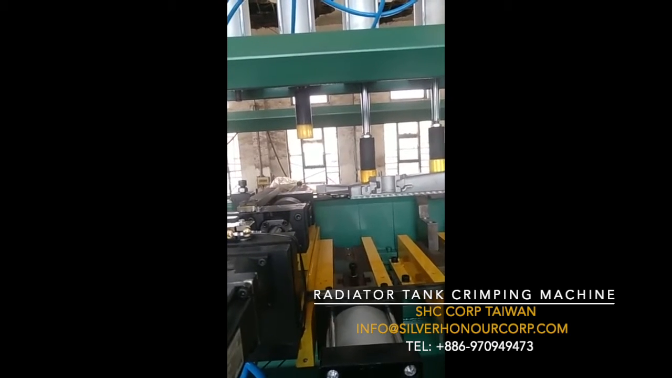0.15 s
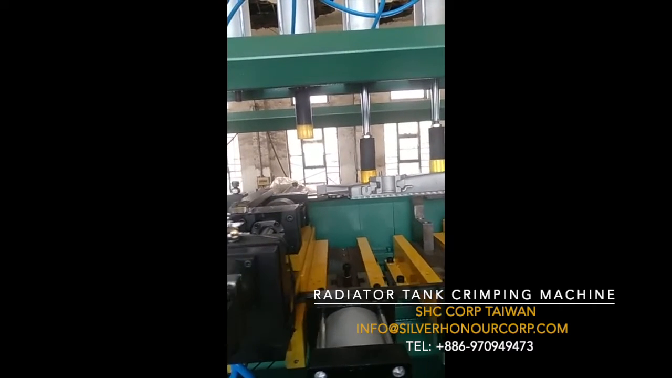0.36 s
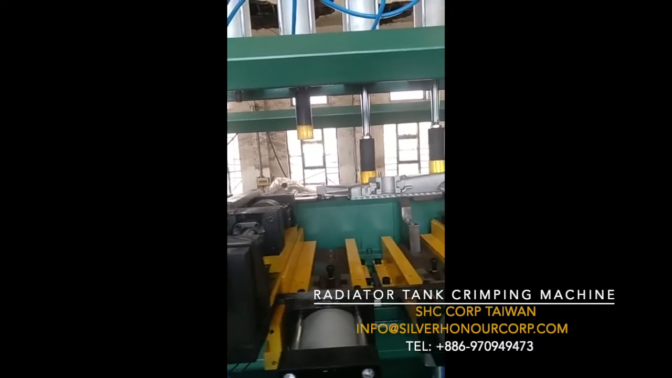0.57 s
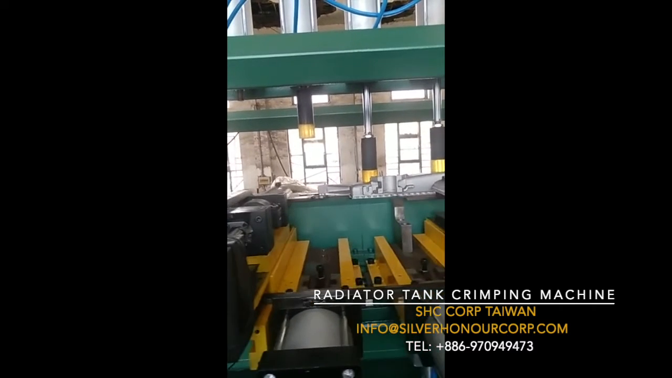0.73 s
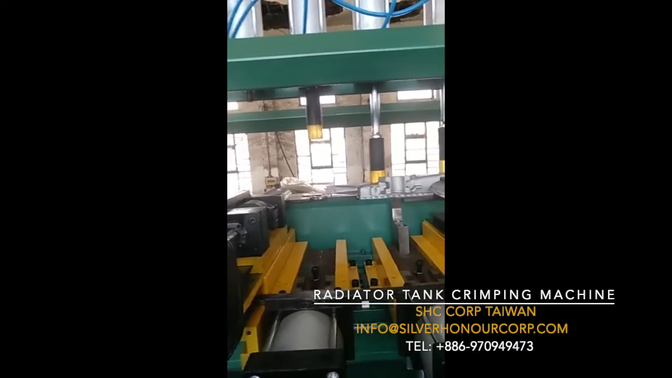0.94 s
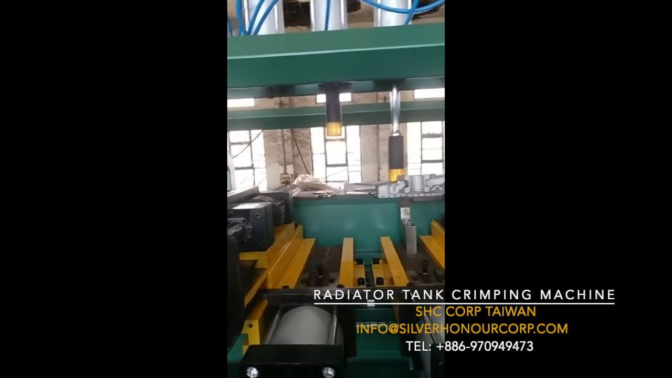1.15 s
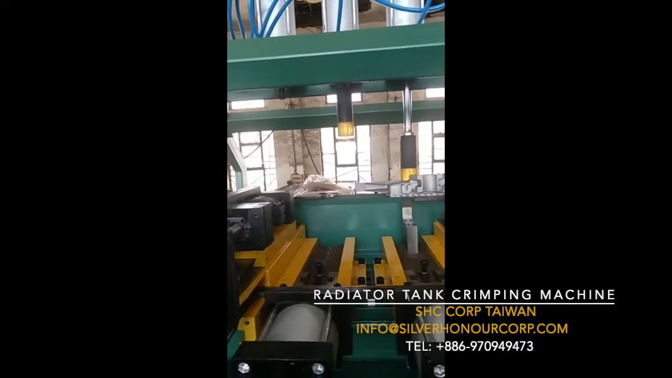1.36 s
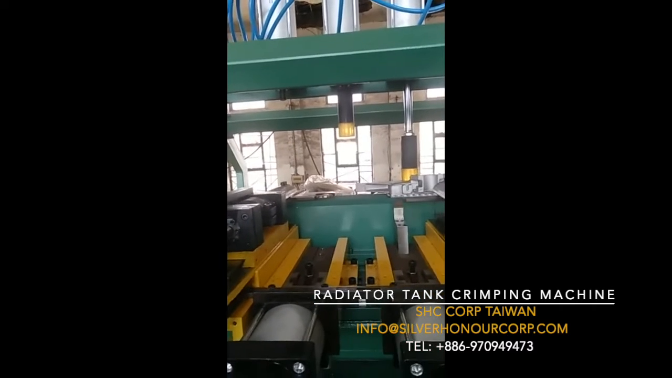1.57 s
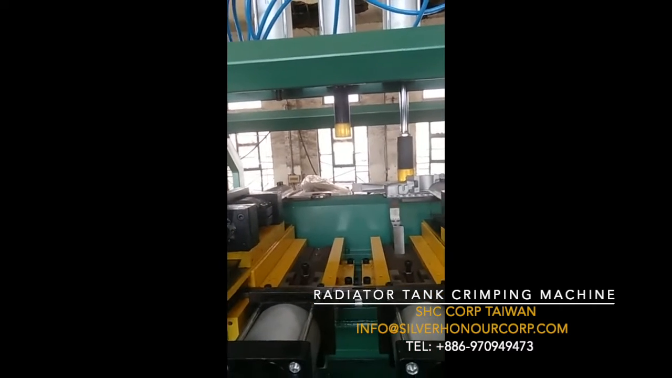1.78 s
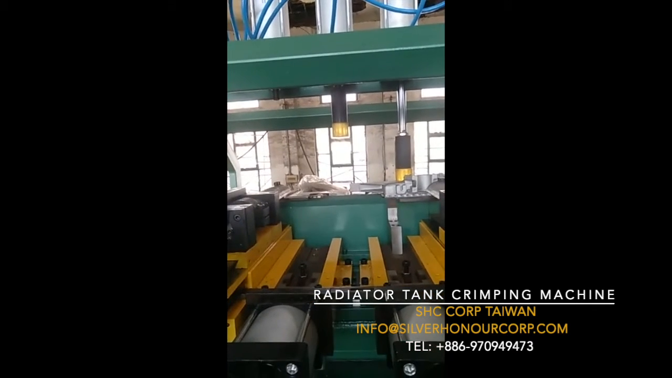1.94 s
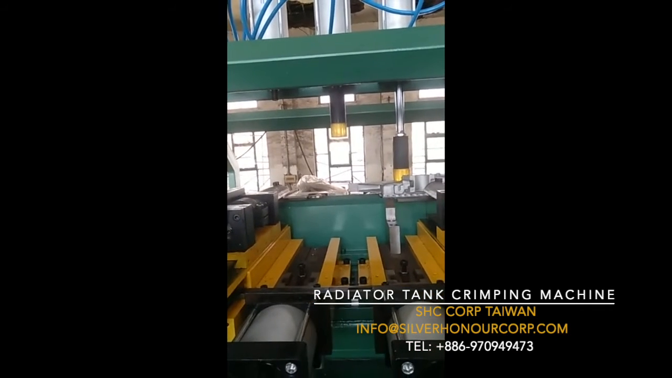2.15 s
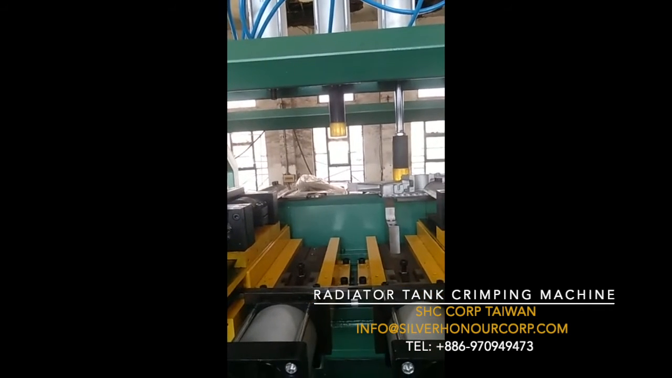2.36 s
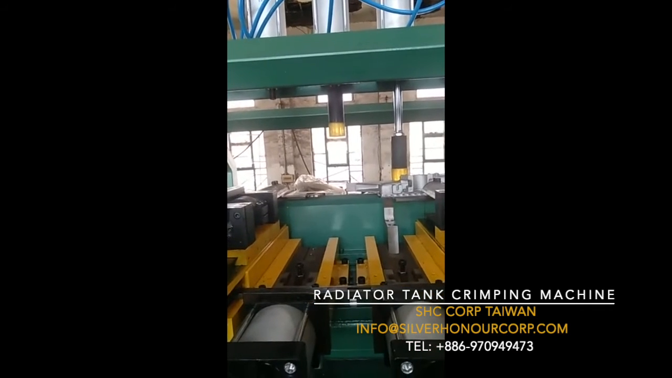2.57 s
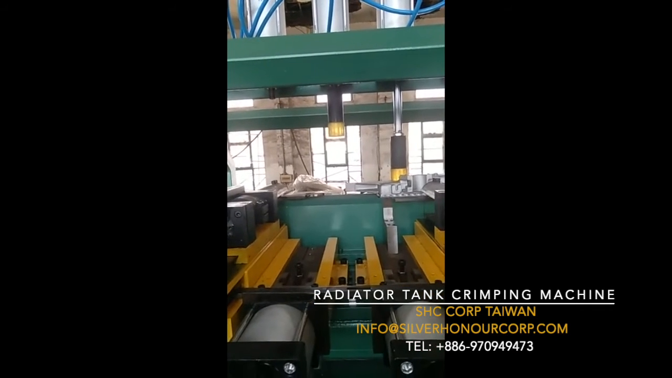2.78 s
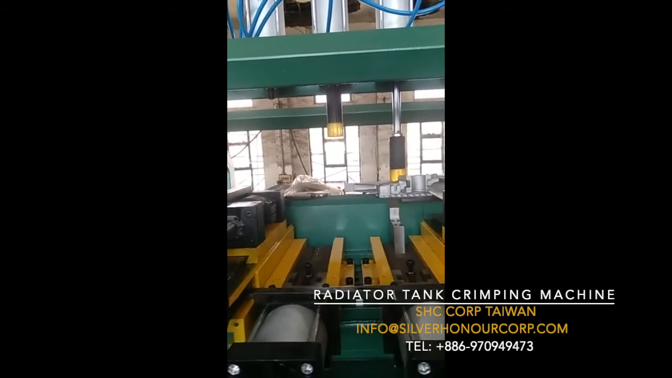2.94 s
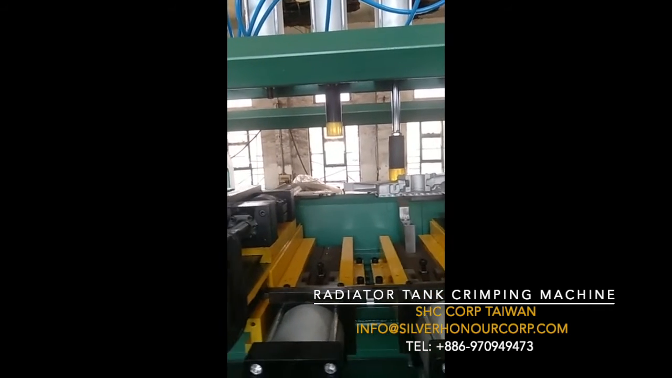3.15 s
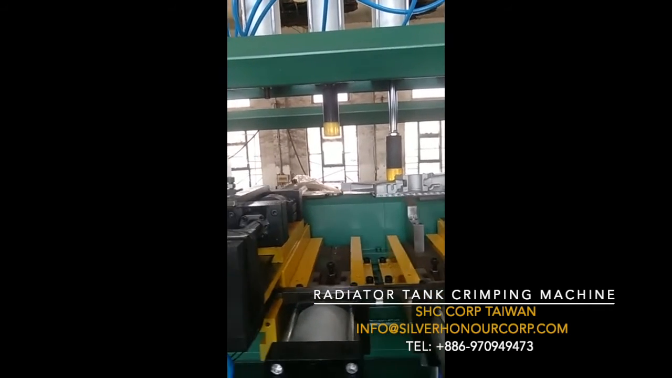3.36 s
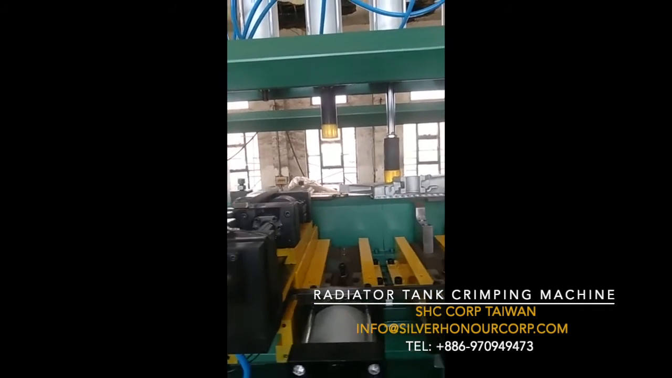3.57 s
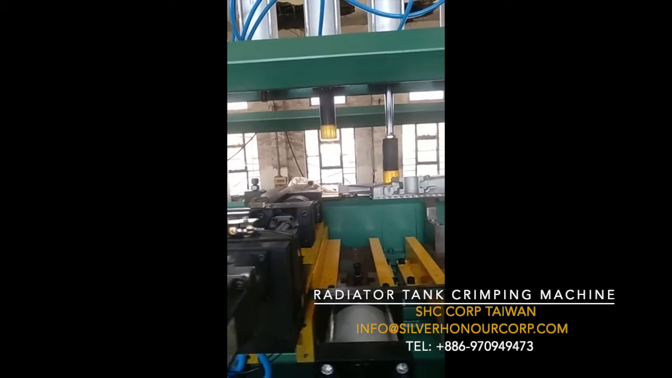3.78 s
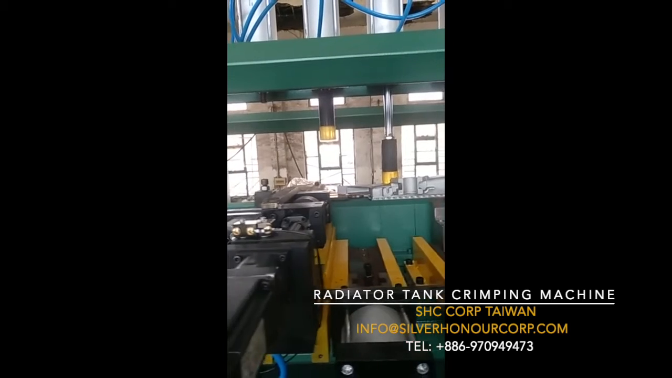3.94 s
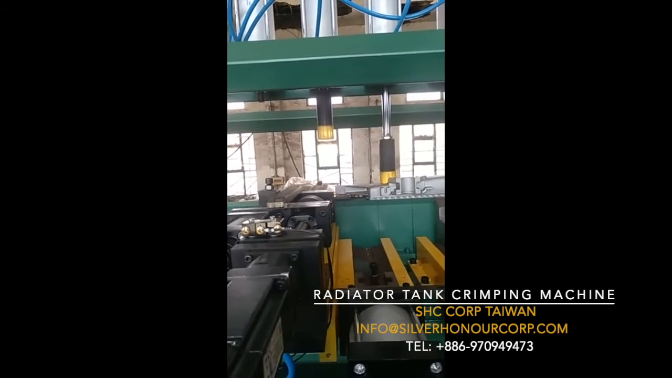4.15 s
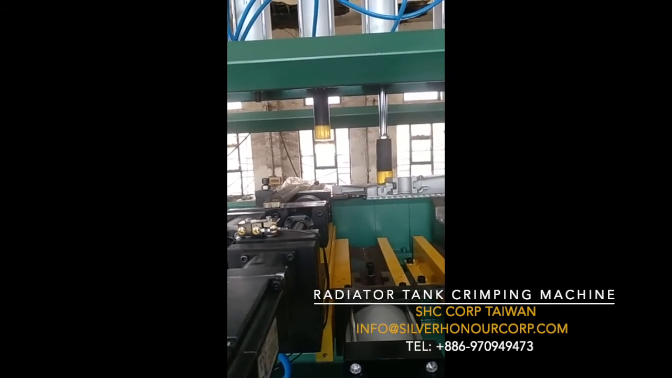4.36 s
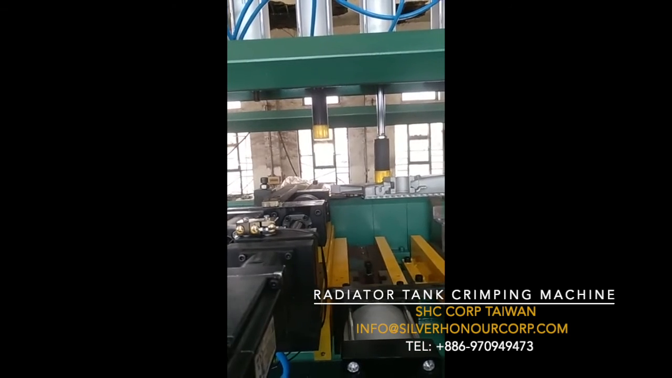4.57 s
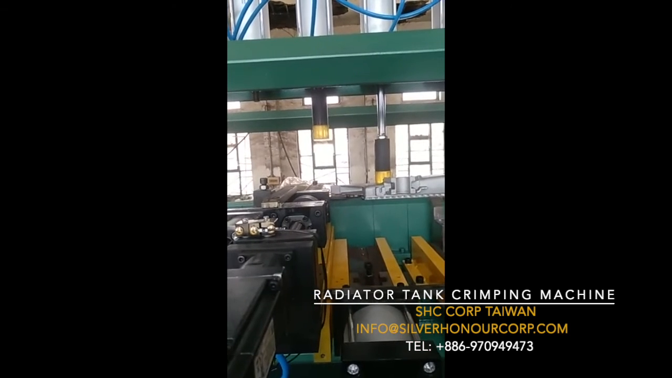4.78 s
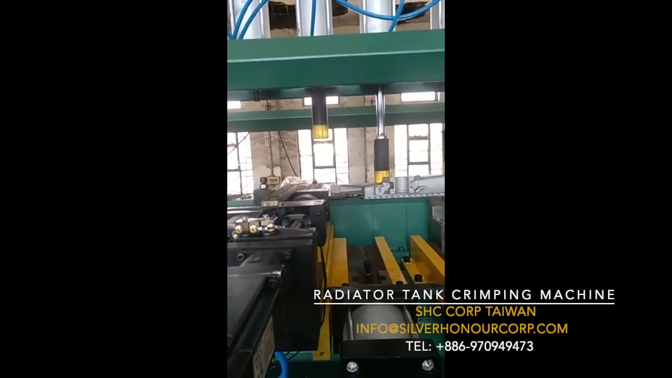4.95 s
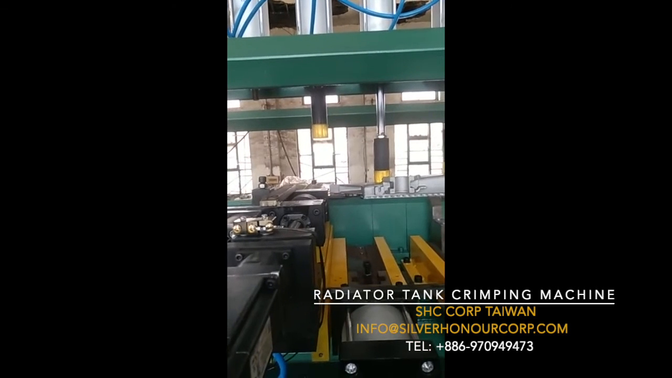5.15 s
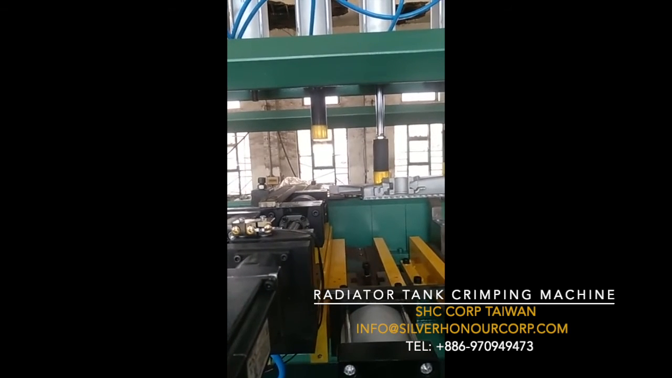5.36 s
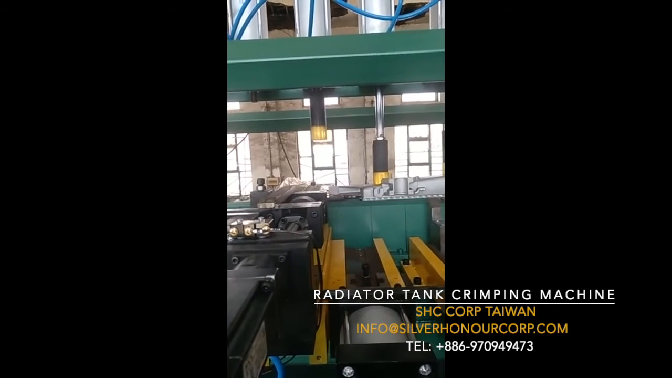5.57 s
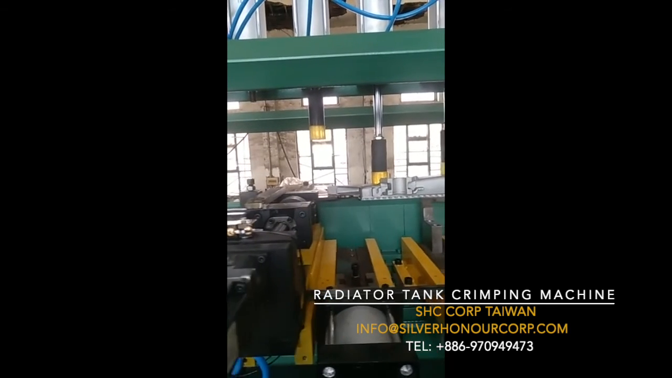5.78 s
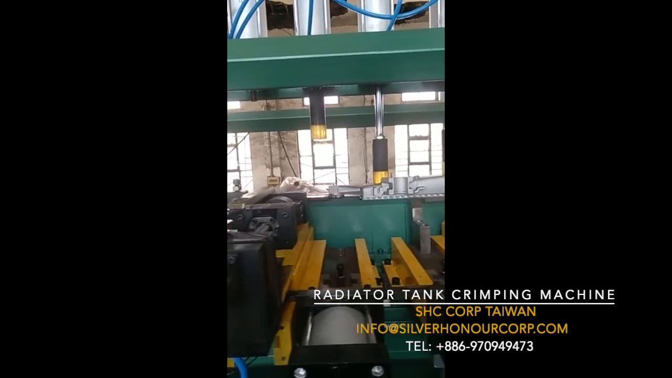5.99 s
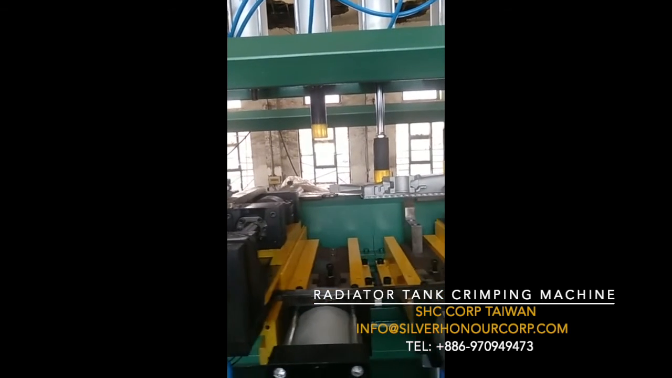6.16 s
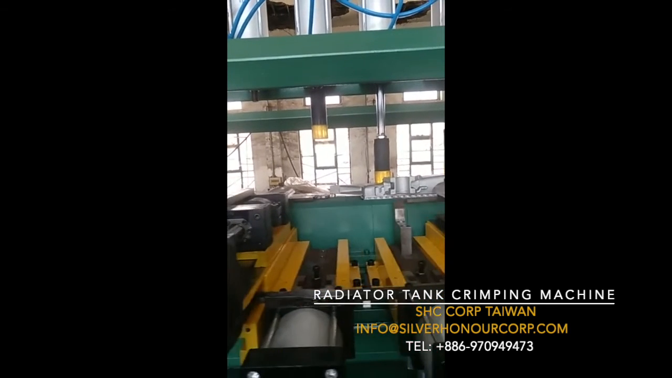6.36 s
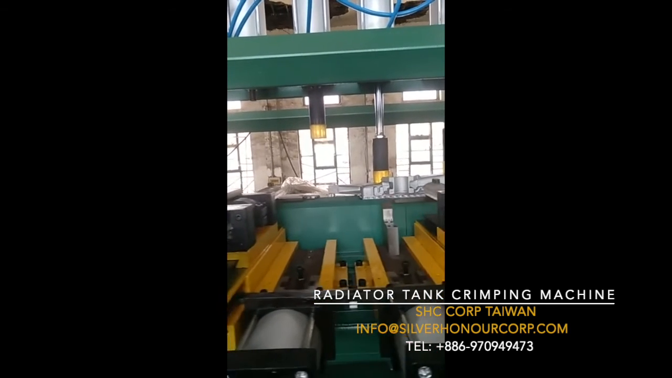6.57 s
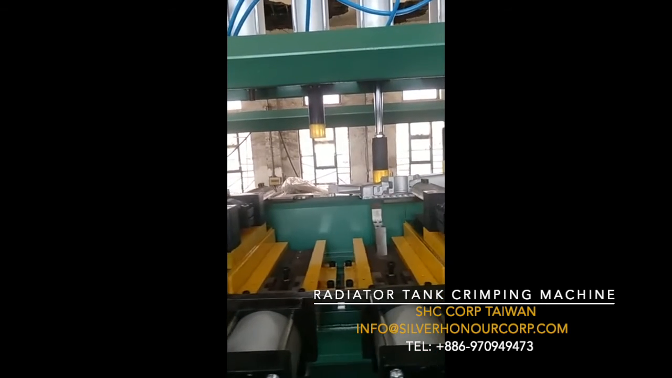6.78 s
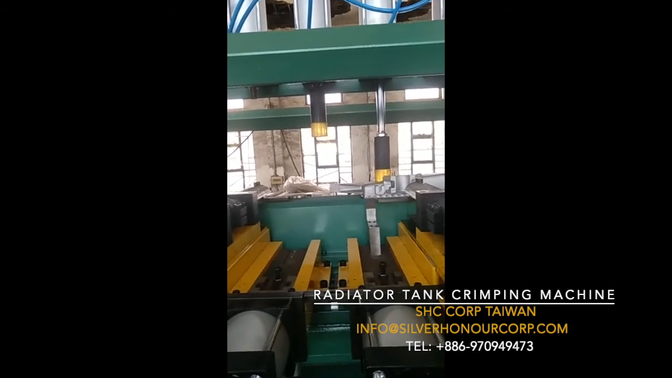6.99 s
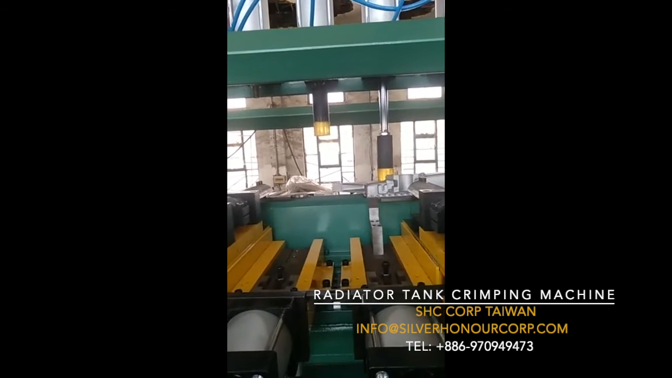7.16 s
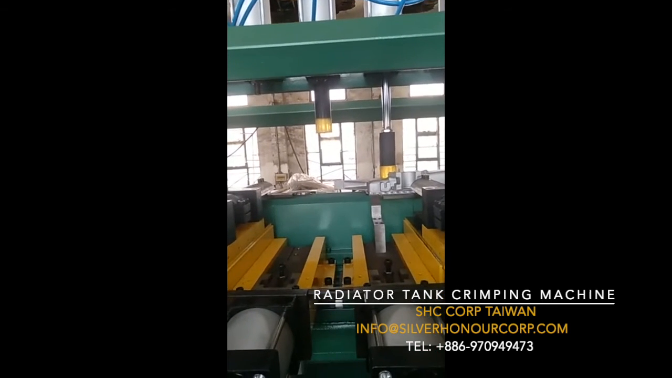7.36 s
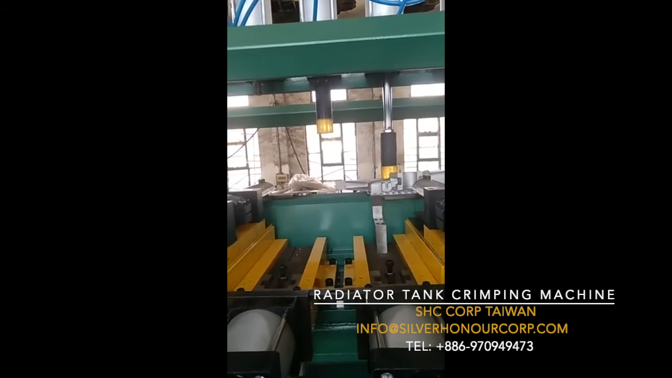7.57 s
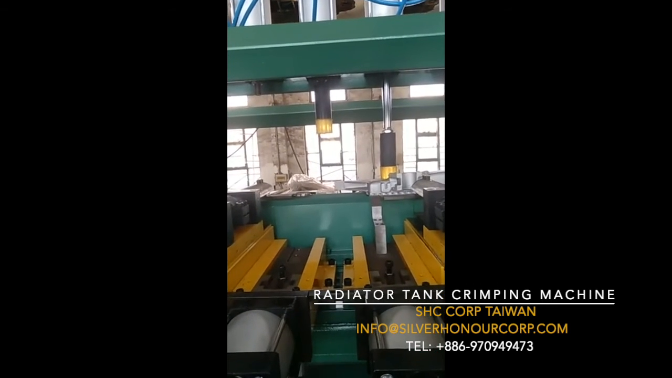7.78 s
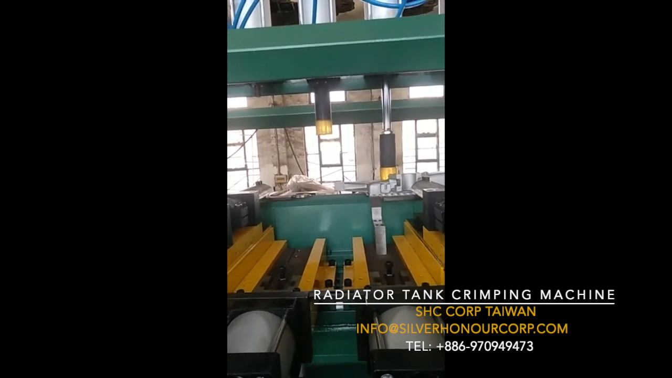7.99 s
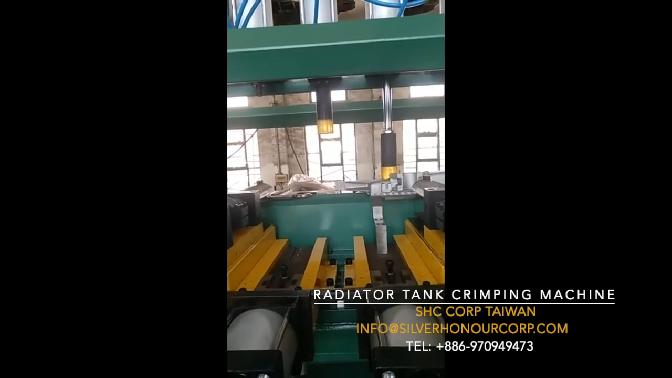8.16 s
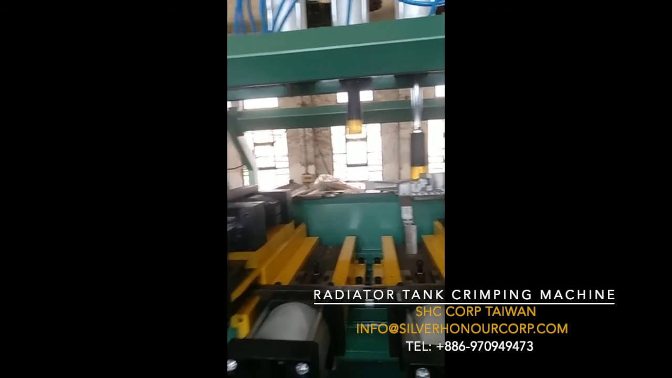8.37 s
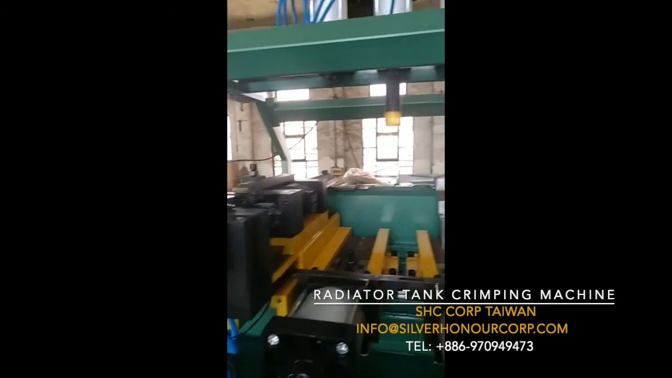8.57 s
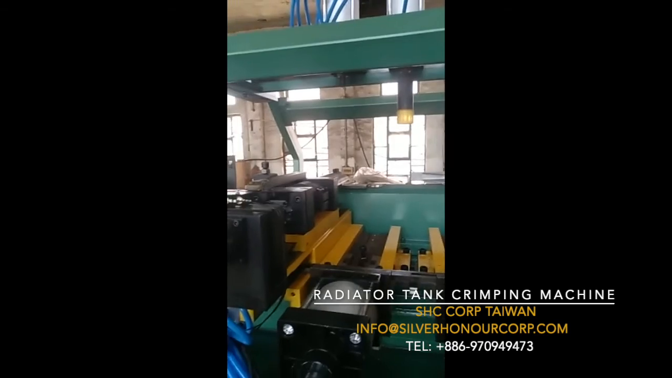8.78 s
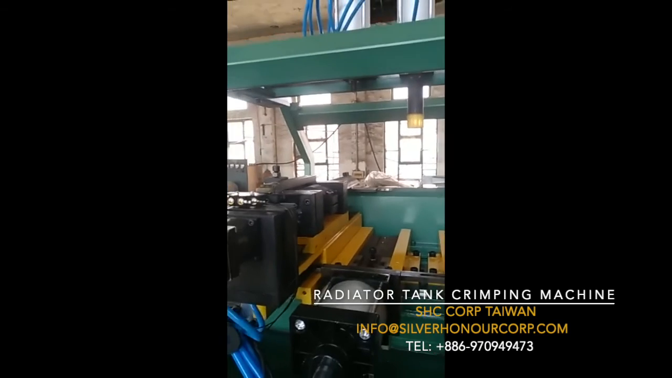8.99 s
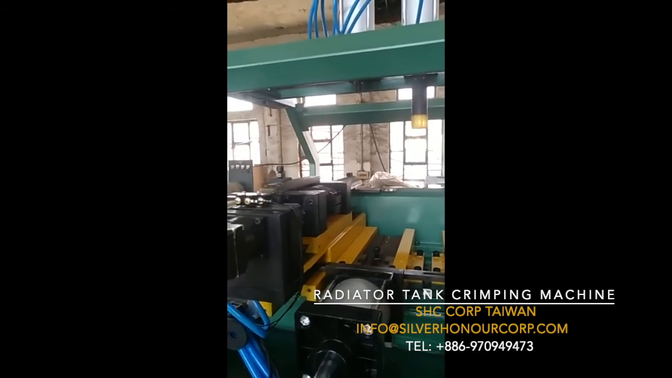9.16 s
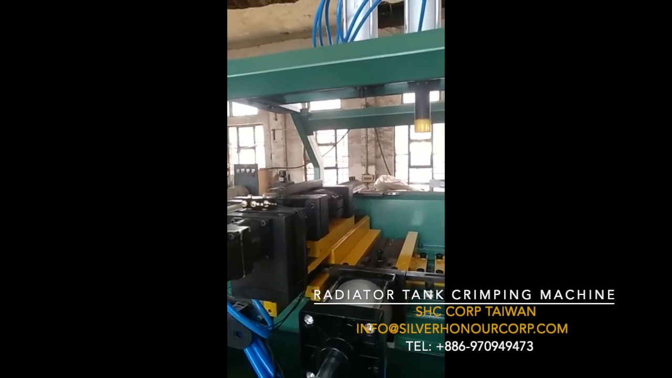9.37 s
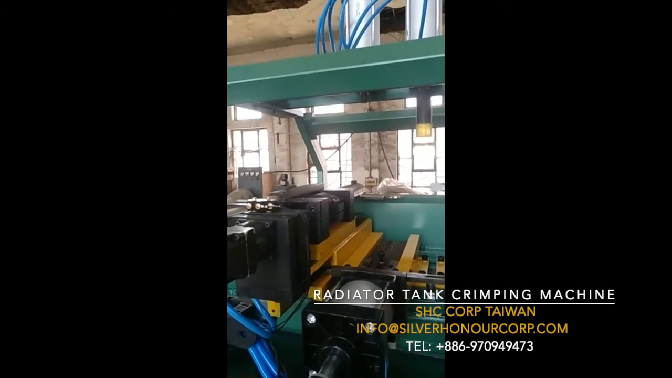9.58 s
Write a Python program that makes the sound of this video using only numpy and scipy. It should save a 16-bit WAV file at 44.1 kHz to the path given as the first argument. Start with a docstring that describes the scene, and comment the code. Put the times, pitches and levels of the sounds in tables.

```python
"""Crimping machine in a hall

A carriage on a fast drive screw runs out, back and out again. Its balls repeat a bumpy track at every turn,
heard as growl and hiss with screw tones, and the hall, a decaying noise tail, rings on after each stop.
Before the second run and after the last the drive creeps: stick-slip makes a bright chatter of tiny rings.
Sine tones form the whine of the electronics; filtered noise forms the steady factory background."""
import sys
import numpy as np
from scipy import signal
from scipy.fft import rfft, irfft, next_fast_len
from scipy.io import wavfile
from scipy.ndimage import map_coordinates

SR = 44100
rng = np.random.default_rng(int(sys.argv[2]) if len(sys.argv) > 2 else 0)


def generate_wav(signal):
    """Clip the signal to [-1, 1] and save it as 16-bit WAV at the path in sys.argv[1]."""
    frames = np.transpose(np.atleast_2d(signal))
    scaled = np.clip(frames, -1, 1) * 32767
    pcm = np.round(scaled).astype(np.int16)
    wavfile.write(sys.argv[1], SR, pcm)


N = 424683  # length in samples


def amp(db):
    """Decibel law: a level in dB as an amplitude factor."""
    return 10 ** (np.asarray(db) / 20)


def unit(x):
    """Normalisation: x scaled to rms 1."""
    return x / np.sqrt(np.mean(x ** 2) + 1e-20)


def clock():
    """Sampling: the time of every sample in seconds."""
    return np.arange(N) / SR


def along(points, hz):
    """Logarithmic frequency scale: interpolates (Hz, value) points."""
    point_hz, value = np.transpose(points)
    return np.interp(np.log(hz + 1), np.log(point_hz + 1), value)


def wobble(rate):
    """Slow random fluctuation: a smooth curve through rate random knots a second."""
    knots = rng.standard_normal(int(N * rate / SR) + 4)
    coarse = map_coordinates(knots, [np.arange(0, N, 64) * rate / SR])
    return np.interp(np.arange(N), np.linspace(0, N, len(coarse)), coarse)


def gate(start, end, attack_s, release_s):
    """Exponential envelope: a rise up to start, a hold, and a fall after end."""
    t = clock()
    return np.exp(-np.maximum(start - t, 0) / attack_s - np.maximum(t - end, 0) / release_s)


def filtered(x, response):
    """Linear filtering: the spectrum of x times a complex response of frequency."""
    m = next_fast_len(N + SR // 2)
    return irfft(rfft(x, m) * response(np.fft.rfftfreq(m, 1 / SR)), m)[:N]


def coloured(x, spectrum):
    """Spectral shaping: x weighted by a spectrum, at rms 1."""
    return unit(filtered(x, lambda hz: amp(along(spectrum, hz))))


def noise(spectrum):
    """Broadband noise: fresh random samples shaped by a spectrum, at rms 1."""
    return coloured(rng.standard_normal(N), spectrum)


def tone(hz, drift):
    """Pure tone: a sine of rms 1 whose phase wanders by about drift radians."""
    return np.sqrt(2) * np.sin(2 * np.pi * (hz * clock() + rng.random()) + drift * wobble(4.5))


# Reverberation of the hall. Each row: frequency in Hz, time to decay by 60 dB in seconds.
HALL_DECAY = [(100, 2), (400, 1.54), (1500, 1.15), (3500, 1.14), (7500, 0.95)]


def hall(x):
    """Reverberation: x convolved with a noise tail in which each frequency dies at its own speed."""
    hz, t, bins = signal.stft(rng.standard_normal(int(1.3 * SR)), SR, nperseg=256)
    decay = amp(-60 * t / along(HALL_DECAY, hz)[:, None])
    tail = signal.istft(bins * decay, SR, nperseg=256)[1]
    # the answer starts 400 samples late and has unit energy
    return signal.fftconvolve(x, np.pad(tail, (400, 0)) / np.linalg.norm(tail))[:N]


# Spectrum of the factory noise. Each row: frequency in Hz, relative level in dB per Hz.
HALL_NOISE_SPECTRUM = [(25, -26.5), (110, -15.5), (250, -8.5), (380, -9.5), (600, -9.5), (950, -9.5),
                       (1110, -13), (1230, -7), (1400, -8.5), (1520, -11.5), (2330, -14), (2620, -10),
                       (2960, -15.5), (7500, -16)]


def hall_noise(level_db=-37.5):
    """Stationary broadband noise: the factory's steady sound, with a slightly wavering level."""
    return amp(level_db + 0.56 * wobble(5)) * noise(HALL_NOISE_SPECTRUM)


def rumble(floor_db=-57, stop_db=-46, fade_db_per_s=8):
    """Exponential decay: deep noise is stirred by braking, dies after the stop, and adds to a floor in power."""
    t, stirred = clock(), np.zeros(N)
    for start, full, brake, stop, *_ in CARRIAGE_RUNS:
        stirred += (t > brake) * amp(stop_db - fade_db_per_s * np.maximum(t - stop, 0))
    deep = noise([(25, -16.5), (55, -9), (72, -9.5), (105, -2), (180, -0.5), (280, -5.0), (600, -60.0)])
    return np.hypot(amp(floor_db), stirred) * deep


# Tones of the powered drive. Each row: frequency in Hz, rms level in dB before the slow level curve.
WHINE_TONES = [(247.5, -58.5), (1236.8, -52), (1388.9, -54.5), (2628.4, -59), (2668.3, -47)]
# Slow level curve of the whine. Each row: time in seconds, gain in dB.
WHINE_GAIN = [(0, -3.5), (2, 1), (5.4, 0), (7.2, -2)]


def whine():
    """Superposition of pure tones: the powered drive's electronics whine with a slowly changing level."""
    tones = sum(amp(db + .8 * wobble(4)) * tone(hz, drift=.15) for hz, db in WHINE_TONES)
    return amp(np.interp(clock(), *np.transpose(WHINE_GAIN))) * tones


# Harmonics of the creeping motor. Each row: multiple of the motor frequency, rms level in dB before fading.
MOTOR_HARMONICS = [(4, -49), (5, -50)]


def motor_hum(motor_hz=91, fade_db_per_s=2.5, rise_s=.1, fall_s=0.045, delay_s=.25):
    """Harmonic series: the slowly turning motor settles into a soft hum that fades as the creep goes on."""
    t, turning = clock(), np.zeros(N)
    for start, end, *_ in CREEP_PHASES:
        fade = amp(-fade_db_per_s * np.maximum(t - start, 0))
        turning += gate(start + delay_s, end, rise_s, fall_s) * fade
    harmonics = [amp(db + 2.5 * wobble(4)) * tone(order * motor_hz, drift=.4) for order, db in MOTOR_HARMONICS]
    return turning * sum(harmonics)


# Brief gliding tones while the drive creeps. Each row: start in seconds, end in seconds, start frequency in Hz,
# end frequency in Hz, rms level in dB before the rounded onset and end.
GLIDING_TONES = [(2.41, 2.6, 528, 575, -42), (7.459, 7.92, 592, 500, -44), (7.65, 8, 190, 182, -47),
                 (9.248, 9.55, 645, 662, -48), (9.301, 9.55, 258, 268, -48.5)]


def gliding_tones():
    """Frequency modulation: each tone's phase sums a linearly gliding frequency."""
    out = np.zeros(N + SR)
    for start, end, start_hz, end_hz, db in GLIDING_TONES:
        n = round(abs(end - start) * SR) + 1
        phase = 2 * np.pi * np.cumsum(np.linspace(start_hz, end_hz, n)) / SR + 0.6 * wobble(20)[:n]
        out[round(start * SR):][:n] += amp(db) * np.sqrt(2) * np.sin(phase) * signal.windows.tukey(n, .5)
    return out[:N]


# Booms of the frame as the screw gets up to speed. Each row: time of the top in seconds, frequency in Hz,
# level at the top in dB (rms of the sine), time constant of the fall in seconds.
FRAME_BOOMS = [(0.33, 357, -23.5, 0.19), (2.75, 222, -27, .04), (2.88, 164, -31, .08),
               (5.72, 360, -25, 0.24)]


def booms(rise_share=0.47):
    """Damped resonance: the frame's booms swell along a Gaussian and die away exponentially."""
    t, out = clock(), np.zeros(N)
    for top, hz, db, fall_s in FRAME_BOOMS:
        rise = ((t - top) / (rise_share * fall_s)) ** 2
        swell = np.exp(-np.where(t < top, rise, np.abs(t - top) / fall_s))
        out += amp(db) * swell * np.sqrt(2) * np.sin(2 * np.pi * hz * t + .9 * wobble(25))
    return out


# Phases in which the drive creeps. Each row: first slip in seconds, end in seconds, attack time constant in
# seconds, chatter level in dB before swell and easing, initial upper ring in dB relative to that level.
CREEP_PHASES = [(2.265, 2.625, .02, -26.5, -5.5), (7.479, 9.7, 0.034, -25.5, -8)]
SLIP_HZ = 39.93  # beat of the slips


def creeping(release_s=0.018, swell_db=1.2, swell_period_s=1.21, swell_top_s=0.89,
             ease_db_per_s=0.66, upper_fade_db_per_s=5.5):
    """Periodic friction: it swells once a slow turn, while the chatter eases and its upper ring dulls.

    Returns time since the first slip in s, strength as an amplitude, and upper ring level in dB."""
    t, age, level, upper_db = clock(), np.zeros(N), np.zeros(N), np.zeros(N)
    for start, end, attack_s, db, ring_db in CREEP_PHASES:
        strength = amp(db) * gate(start, end, attack_s, release_s)
        now = strength > level  # the stronger creep is the current one
        age = np.where(now, t - start, age)
        level = np.where(now, strength, level)
        upper_db = np.where(now, ring_db, upper_db)
    elapsed = np.maximum(age, 0)
    friction_db = swell_db * np.cos(2 * np.pi * (age - swell_top_s) / swell_period_s)
    return age, level * amp(friction_db - ease_db_per_s * elapsed), upper_db - upper_fade_db_per_s * elapsed


# Resonances of the drive housing. Each row: centre in Hz, width in Hz, relative level in dB.
HOUSING_MODES = [(423, 330, -6.5), (882, 120, -4.5), (1374, 190, 0.5), (1940, 360, -3.5), (2880, 770, -6.5),
                 (4090, 170, -2), (4680, 310, -9.5), (6140, 570, -12.5), (6780, 220, -8)]


def housing(x):
    """Modal resonance: a sum of band-pass modes with alternating sign."""
    def response(hz):
        total = 0
        for k, (centre, width, db) in enumerate(HOUSING_MODES):
            damping = 1j * hz * width
            total = total + (-1) ** k * amp(db) * damping / (centre * centre - hz * hz + damping)
        return total
    return filtered(x, response)


# Spectrum of the slips' ring. Each row: frequency in Hz, relative level in dB per Hz.
RASP_SPECTRUM = [(1000, -45), (1950, -26), (2250, -7.5), (2340, -14.5), (2470, -4.5), (2700, 2.5),
                 (2880, -7.5), (3060, -11.5), (3300, -16.5), (3500, -30.5), (4050, -19), (4800, -38.5)]


def chatter(age, level, upper_db, grains_hz=1100, scatter_db=3, pulse_db=2.0, rasp_db=-0.84, scrape_db=-7.0):
    """Stick-slip: dense tiny rings bunch in a fast beat over a scrape in the housing."""
    beat = 2 * np.pi * SLIP_HZ * age + .3 * wobble(4)
    bunch = amp(pulse_db * (np.cos(beat) + .5 * np.cos(2 * beat)))
    grains = (rng.random(N) < grains_hz / SR) * rng.choice([-1, 1], N)
    grains = grains * amp(scatter_db * np.clip(rng.standard_normal(N), -2, 1))
    late_grains = np.roll(grains, SR // 400)  # the upper ring answers 2.5 ms later
    upper = coloured(late_grains * bunch, [(2500, -49), (2850, -6), (3050, -0.5), (3300, -10.5), (3600, -53.5)])
    rasp = amp(rasp_db) * coloured(grains * bunch, RASP_SPECTRUM) + amp(upper_db) * upper
    scrape = unit(housing(rng.standard_normal(N) * np.sqrt(bunch)))
    return level * (rasp + amp(scrape_db) * scrape)


# Slips that stand out of the chatter. Each row: time in seconds, peak in dB before the common tick gain.
STRONG_SLIPS = [(2.2655, -14.5), (2.3126, -12.5), (2.3343, -12.5), (2.4371, -10.5), (2.581, -13.5),
                (7.7772, -12), (7.8511, -11.5), (7.9545, -11.5), (8.4322, -10.5), (8.4543, -10.5),
                (8.55, -12), (9.1807, -12), (9.3801, -11.5), (9.5557, -13)]


def slips(level, slip_db=2.5, spread_db=3.0, jitter_s=.0028, tick_db=-2, tick_hz=2700, tick_s=0.0018):
    """Stick-slip impulses: one ring a beat, of chance strength unless a hard slip replaces it."""
    hard_s, hard_db = np.transpose(STRONG_SLIPS)
    beats = np.concatenate([np.arange(start, end, 1 / SLIP_HZ) for start, end, *_ in CREEP_PHASES])
    beats = beats[np.abs(beats[:, None] - hard_s).min(axis=1) > .5 / SLIP_HZ]
    late, strength = rng.standard_normal((len(beats), 2)).T
    chance_peaks = np.interp(beats, clock(), level) * amp(slip_db + spread_db * np.minimum(strength, 2))
    times = np.append(beats + jitter_s * late, hard_s)
    peaks = np.append(chance_peaks, amp(hard_db + tick_db))
    out, age = np.zeros(N + SR), np.arange(SR // 100) / SR
    swell = np.exp(-((age - tick_s * 1.3) / tick_s) ** 2)  # a few cycles of the ring
    for s, peak in zip(times, peaks):
        ring = np.sin(2 * np.pi * tick_hz * (1 + 0.05 * rng.standard_normal()) * age)
        out[round(s * SR):][:len(age)] += peak * ring * swell
    return out[:N]


# Jolts as the drive takes up the load. Each row: time in seconds, crash level in dB, steel ping level in dB,
# both as rms before the decay.
LOAD_JOLTS = [(0.165, -16.5, -29), (2.721, -21.5, -20.5), (5.535, -13.5, -34)]


def jolts(decay_s=0.015, ping_hz=3900, ping_s=0.0063):
    """Impact excitation: a short noise crash and a damped steel ping begin each run."""
    t, out = clock(), np.zeros(N)
    crash = noise([(100, -14.0), (500, -3.0), (1300, 7.0), (3000, 1), (4500, -12.5), (7500, -14.5)])
    ping = tone(ping_hz, drift=0)
    for s, crash_db, ping_db in LOAD_JOLTS:
        age = np.abs(t - s)
        burst = amp(crash_db) * np.exp(-age / decay_s) * crash
        strike = amp(ping_db) * np.exp(-age / ping_s) * ping
        out += (t >= s) * (burst + strike)
    return out


# Tones of the screw. Each row: multiple of the turn rate, rms level in dB going out, rms level in dB going back,
# both for fully built-up tones.
SCREW_ORDERS = [(16, -37.2, -38.8), (26, -33, -29.5), (27, -24.4, -29), (28, -36.5, -38.1),
                (36, -35.1, -49.7), (37, -40.5, -36.2), (39, -39.9, -35.4), (42, -47.7, -36.9),
                (46, -37.2, -49.3), (49, -36.2, -33.8), (50, -33.4, -37.0), (51, -36.2, -32.4),
                (52, -38.2, -31.6), (53, -33.0, -40.4), (54, -42.9, -35.2), (57, -40.8, -36.0),
                (60, -40.2, -28.9), (62, -36.0, -30.2), (64, -30.5, -32.6), (65, -36.4, -33.0),
                (71, -37.4, -41.2), (75, -36.4, -36.6), (76, -39.1, -31.8), (77, -41.3, -31.8),
                (78, -32.8, -39.1), (79, -36.1, -36.0), (88, -35.6, -33.3), (89, -35.1, -39.6),
                (92, -51.1, -37.2), (94, -36.2, -44.9)]
TURN_HZ = 14.02  # turns of the screw a second at full speed


def screw_tones(at_speed, back, ring_s=0.089):
    """Resonant build-up: full-speed tones at multiples of the turn rate grow in frame and hall, then ring out."""
    keep = np.exp(-1 / (ring_s * SR))
    swell = signal.lfilter([1 - keep], [1, -keep], at_speed)
    heard = np.flatnonzero(swell > 1e-3)
    t, out = heard / SR, np.zeros(N)
    for order, *levels_db in SCREW_ORDERS:
        phase = 2 * np.pi * (order * TURN_HZ * t + rng.random()) + .25 * wobble(4)[heard]
        out[heard] += amp(levels_db[back] + 0.72 * wobble(3)[heard]) * np.sqrt(2) * np.sin(phase)
    return swell * out


# Runs of the carriage. Each row: start, full speed, brake, stop and top of a surge, all in seconds, then surge
# depth in dB (scaled for each layer), hiss and fizz gain in dB, judder level in dB, direction (0 out, 1 back).
CARRIAGE_RUNS = [(0.147, 0.269, 1.428, 1.646, .287, 2.5, 1, -34.5, 0),
                 (2.705, 2.79, 4.02, 4.26, 3.24, 1.7, 2, -35, 1),
                 (5.523, 5.66, 6.82, 7.02, 5.652, 2, 1, -35, 0)]
# Spectrum of the growl. Each row: frequency in Hz, relative level in dB per Hz.
GROWL_SPECTRUM = [(50, -43.5), (120, -25), (215, -7.5), (275, -13), (335, -0.5), (378, 0), (440, -6),
                  (700, -5.5), (1100, -4), (1500, -5), (3000, -15), (4300, -35.5), (7000, -58.5)]
# Spectrum of the balls rolling. Each row: frequency in Hz, relative level in dB per Hz.
HISS_SPECTRUM = [(40, -27), (110, -17), (180, -7), (270, -6.5), (330, -.5), (400, -1), (520, 3),
                 (1200, 3.5), (1900, 1), (2900, -0.5), (3250, -4), (3600, -12), (4500, -18.5), (7600, -33)]
# Spectrum of the wipers sliding. Each row: frequency in Hz, relative level in dB per Hz.
FIZZ_SPECTRUM = [(1000, -25.5), (3000, -3), (4100, 2), (5200, -1.5), (6600, 3.5), (7600, -6)]


def carriage(growl_db=-26, hiss_db=-22, fizz_db=-29, size=3000):
    """Periodic excitation: the balls meet the same bumps every turn, while hiss and fizz surge once a turn.

    Returns the rolling sound and the screw's tones."""
    t, rolling, tones = clock(), np.zeros(N), np.zeros(N)
    bumps = rng.standard_normal((2, size))  # one turn of the track for each direction
    hiss, fizz = noise(HISS_SPECTRUM), noise(FIZZ_SPECTRUM)
    judder = noise([(25, -16.0), (60, -6), (110, -6.5), (168, 5.5), (300, -8.5), (700, -32.5)])
    for start, full, brake, stop, crest, surge_db, run_db, judder_db, direction in CARRIAGE_RUNS:
        back = int(direction > .5)
        speed = np.interp(t, [start, full, brake, stop], [0, 1, 1, 0])
        force = np.interp(t, [start, start + 0.016, brake, stop], [0, 1, 1, 0])
        turns = np.cumsum(speed) * TURN_HZ / SR
        turns -= np.interp(crest, t, turns)  # a surge tops at the crest
        once, twice = np.cos(2 * np.pi * turns), np.cos(4 * np.pi * turns)
        track = np.interp(turns % 1, np.arange(size) / size, bumps[back]) * np.sqrt(speed)
        growl = coloured(track, GROWL_SPECTRUM) * np.sqrt(np.mean(speed))
        rolling += force * growl * amp(growl_db + surge_db * twice)
        # speeding up takes extra force, which eases off
        strain_db = 2 * np.exp(-np.abs(t - start) / 0.12)
        contact = force ** 1.64 * amp(run_db + strain_db + 0.95 * wobble(30))
        rolling += contact * hiss * amp(hiss_db + 0.44 * surge_db * once)
        rolling += contact * fizz * amp(fizz_db + 1.22 * surge_db * once + 1.7 * wobble(12))
        # the frame judders while the screw passes through low speeds
        rolling += amp(judder_db) * judder * np.sin(np.pi * speed)
        tones += screw_tones(np.clip(speed, 0, 1) ** 4, back)
    return rolling, tones


def scene():
    """Superposition: direct sound, its reverberation and the background add up, alike in both channels."""
    background = hall_noise() + rumble() + whine()
    hums = motor_hum() + gliding_tones()
    age, level, upper_db = creeping()
    creep = chatter(age, level, upper_db) + slips(level)
    rolling, tones = carriage()
    run = rolling + jolts()
    mono = background + hums + booms() + tones
    mono += creep + amp(-15) * hall(creep)
    mono += run + amp(-3.5) * hall(run)
    return np.array([mono, mono])


def record(dry, top_hz=7570):
    """Band limiting: nothing at or above the top frequency remains."""
    return np.array([filtered(channel, lambda hz: hz < top_hz) for channel in dry])


dry = scene()
out = record(dry)
generate_wav(out)
```